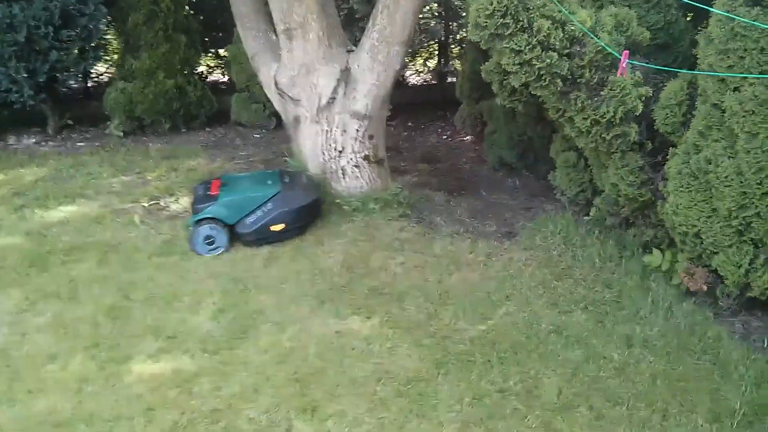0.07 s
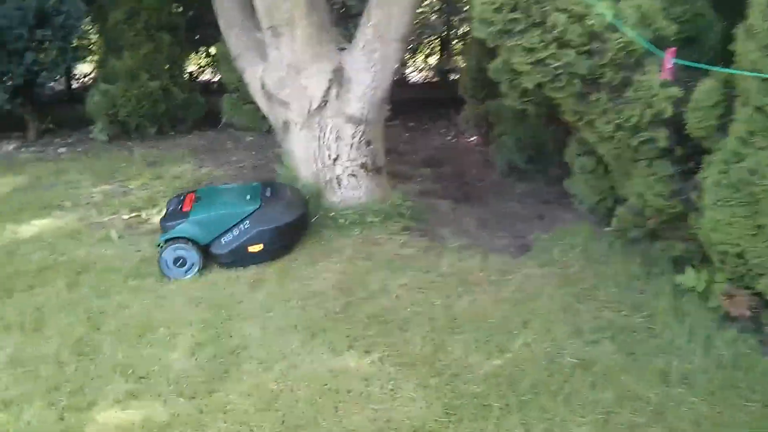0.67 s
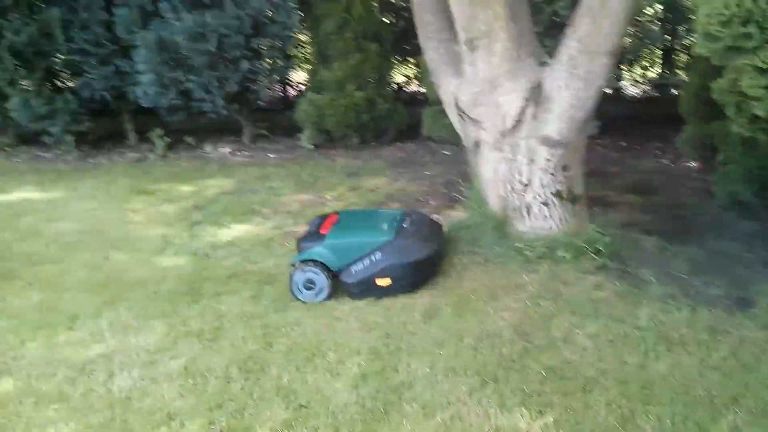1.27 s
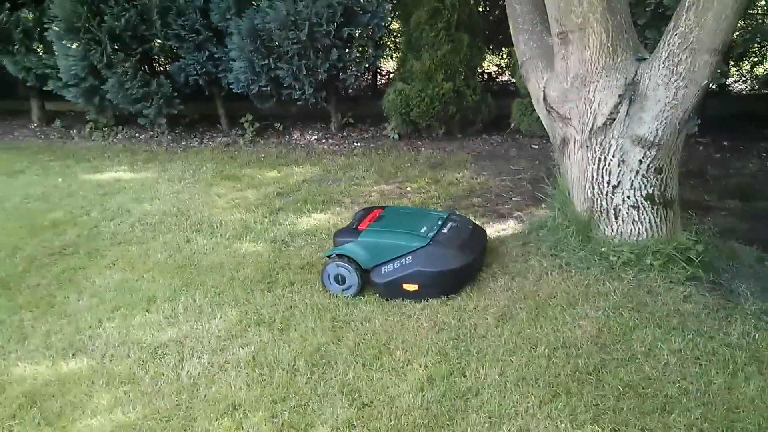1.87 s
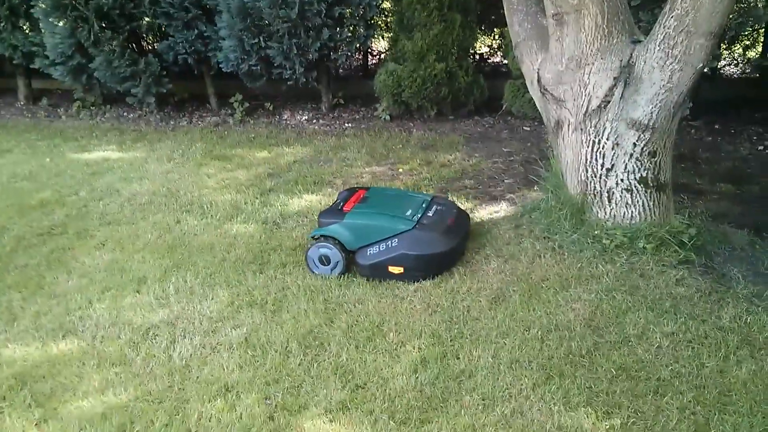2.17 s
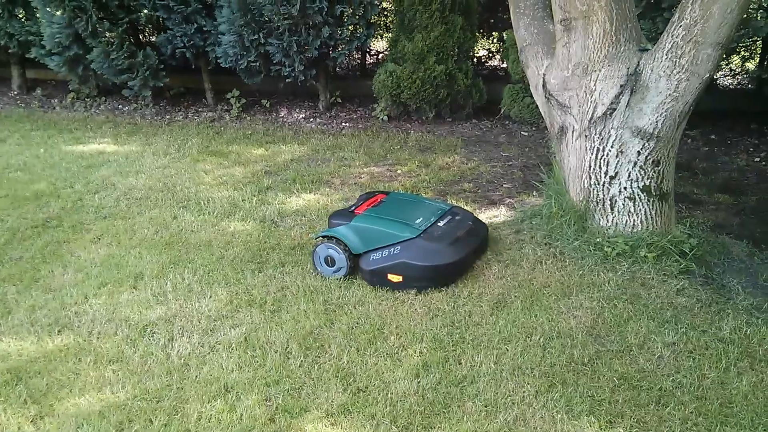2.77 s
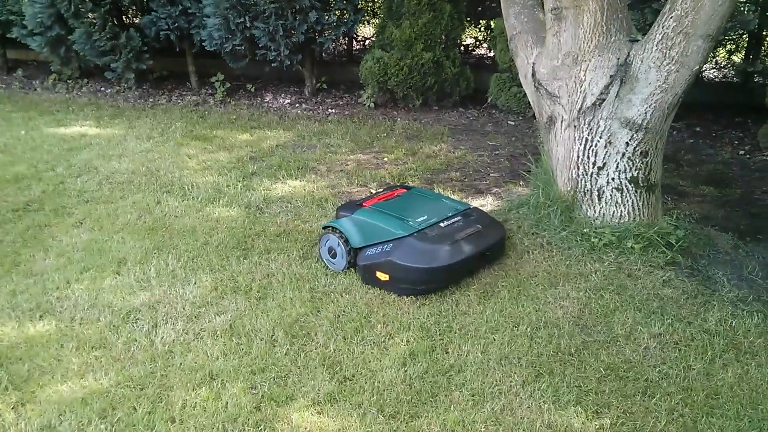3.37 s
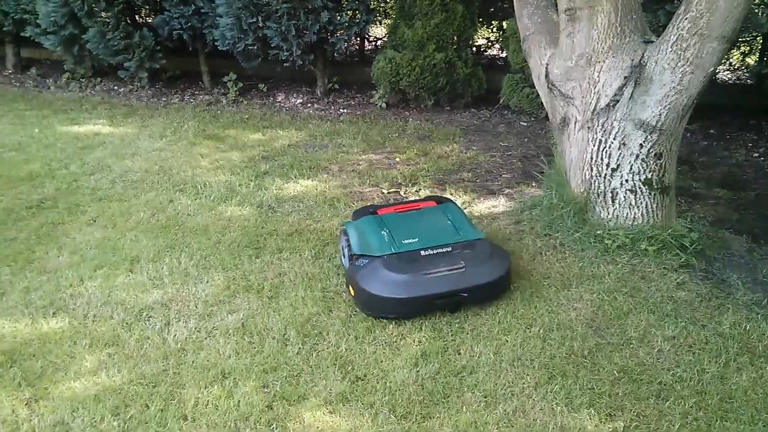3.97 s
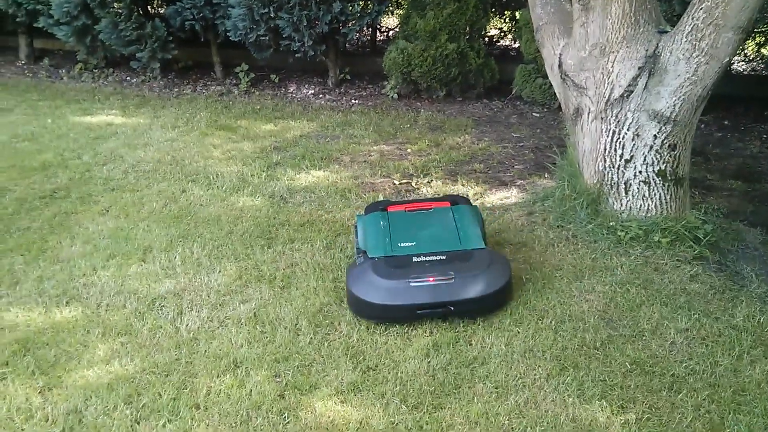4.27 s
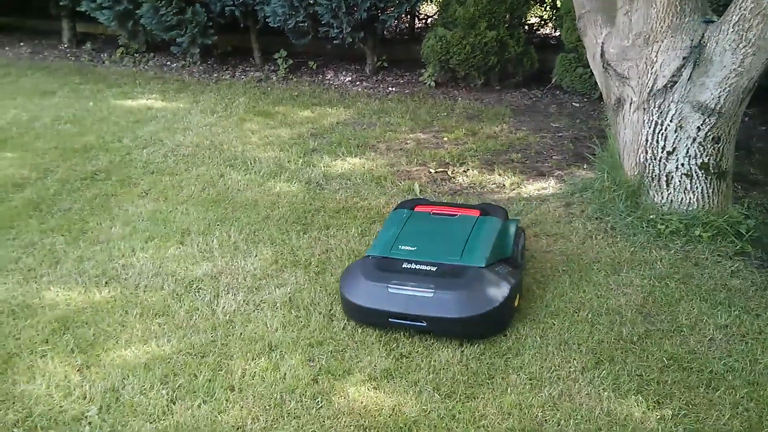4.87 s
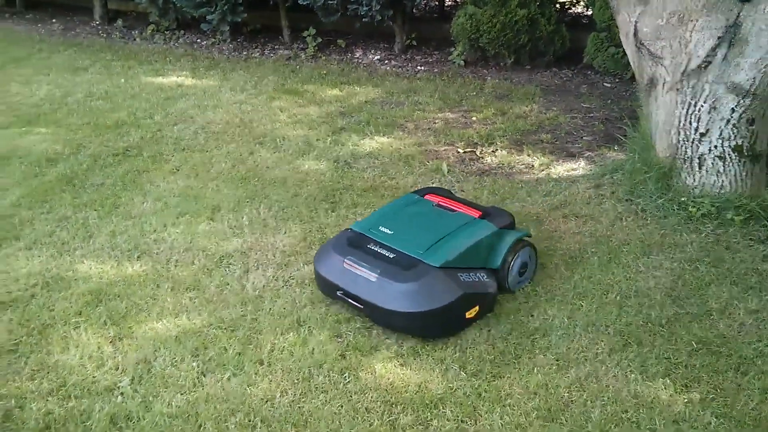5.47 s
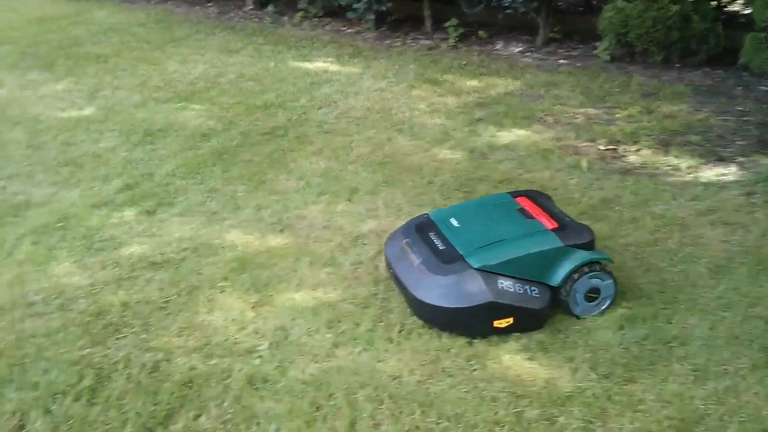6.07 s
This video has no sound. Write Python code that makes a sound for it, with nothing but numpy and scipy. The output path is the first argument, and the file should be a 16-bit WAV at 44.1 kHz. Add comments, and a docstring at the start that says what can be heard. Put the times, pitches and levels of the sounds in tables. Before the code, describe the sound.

Sparrows twitter in a breezy garden as an electric robot mower slows its blade, creeps with a thin whine and resumes cutting.

```python
"""A garden lawn, with a robotic mower a few metres away. The hum and whoosh of its blade wind down,
the wheel motors creep and whine in surges, then the blade spins up again and the machine turns
through the grass: gears chatter, stalks rustle and snip, the plastic chassis clacks.
Sparrows twitter in the hedge, each chirp a run of tiny pitch glides. A breeze rumbles
and thumps on the microphone, over a faint bed of distant air."""
import sys
import numpy as np
from scipy import signal
from scipy.fft import rfft, irfft
from scipy.io import wavfile
from scipy.ndimage import uniform_filter1d

SR = 44100
rng = np.random.default_rng(int(sys.argv[2]) if len(sys.argv) > 2 else 0)


def transcribe(signal):
    """Save signal, clipped to [-1, 1], as a 16-bit WAV file at the path in sys.argv[1]."""
    frames = np.atleast_2d(signal).T
    limited = np.clip(frames, -1, 1)
    pcm = np.round(limited * 32767).astype(np.int16)
    wavfile.write(sys.argv[1], SR, pcm)


N = 269451
TIME = np.arange(N) / SR

# Table levels are relative: each layer gets its final gain in its function.
# blade hum, and its motor driving and braking (multiple of the turning rate, level [dB])
HUM_PARTIALS = [(1, -45), (2, -71.5), (3, -57), (5, -60.5), (7, -79), (10, -65.5), (14, -57), (15, -59.5),
                (21, -67)]
DRIVING_PARTIALS = [(6, -73.5), (12, -82)]
BRAKING_PARTIALS = [(6, -57.5), (12, -59)]
# EQ curves of the noise layers (frequency [Hz], level [dB])
WHOOSH_SIDE_EQ = [(35, -44), (60, -11), (101, -12), (134, 11.5), (253, -0.5), (324, 5.5), (407, -4),
                  (488, -12.5), (623, 3.5), (688, -5), (784, 5), (1300, -10.5), (1960, 2.5), (2420, -24),
                  (3000, -26), (3900, -58), (6600, -120)]  # air swept by the blade, side-on
WHOOSH_FRONT_EQ = [(30, -12), (60, 11), (130, -7), (320, 6.5), (470, 2), (545, -16.5), (650, -0.5),
                   (780, -7), (950, -4), (1400, 8.5), (1800, -6.5), (2400, 2), (3000, -15), (4500, -16)]  # the same, head-on
RUSTLE_EQ = [(300, 10.5), (700, 13), (2000, 15.5), (2700, 9), (3500, 9.5), (5000, 11.5), (6500, 11.5),
             (7800, 4.5), (9300, 4.5), (11000, 5.5), (15500, 5.5)]  # brushed grass
CUT_EQ = [(2500, -47), (4000, -8), (4600, -2.5), (5200, 5), (6000, 4.5), (6900, -1), (7700, -17.5),
          (10000, -48)]  # hiss of the cut
SNIP_EQ = [(2500, -12), (4500, -1), (6800, 7), (8000, -5), (9500, 0), (12000, -3.5), (15500, -3)]  # crisp stalks
WIND_EQ = [(15, -37), (35, 0), (65, 4.5), (115, 0.5), (160, -7), (250, -21), (320, -31.5), (400, -38),
           (800, -57), (1600, -90)]  # low rumble
DISTANT_AIR_EQ = [(30, 22.5), (150, 19.5), (300, 16), (500, 11.5), (800, 12.5), (1200, 12.5), (2000, -9),
                  (2600, -33), (3500, 0), (6000, -4), (15500, -10.5)]  # background bed
# fader rides (time [s], level [dB])
RUSTLE_RIDE = [(0, -55.5), (.2, -55.5), (.3, -63.5), (.85, -67), (1.3, -76), (1.7, -69), (2.2, -80),
               (2.85, -70.5), (2.95, -62), (3.35, -67), (3.9, -58.5), (4.56, -57), (5.2, -58.5),
               (6.11, -61)]  # rises with travel over the lawn
CUT_RIDE = [(2.85, -84), (2.95, -63.5), (3.1, -73), (3.43, -64), (3.7, -57.5), (4.03, -60.5), (4.38, -56),
            (5.02, -57.5), (6.11, -52.5)]  # opens as the deck faces the listener
WHINE_RIDE = [(0, -67.5), (.6, -87), (1.3, -77.5), (1.8, -72), (2.1, -64), (2.7, -63), (3.1, -68.5),
              (4.5, -67), (6.11, -73.5)]  # steady part of the high motor whine
BREEZE_RIDE = [(0, -55), (.55, -57), (.75, -64.5), (1.05, -56.5), (1.25, -52.5), (1.8, -48.5), (1.98, -38),
               (2.7, -36.5), (3, -28.5), (3.25, -36.5), (3.6, -58), (4, -54.5), (4.2, -43), (4.55, -57),
               (4.75, -59.5), (6.11, -58.5)]  # strength of the breeze
GEAR_RIDE = [(0, -80), (.45, -64), (.64, -80), (.76, -65), (.97, -56), (1.3, -76), (1.45, -66.5),
             (1.96, -67), (2.4, -97), (2.75, -65.5), (3.2, -61.5), (3.5, -55.5), (3.9, -60), (4.15, -53.5),
             (4.95, -56.5), (5.22, -48.5), (5.75, -54.5), (6.11, -47.5)]  # chatter follows the load on the gears
# crisp snips and rustles (peak time [s], rise [s], decay [s], level [dB])
GRASS_SNIPS = [(.452, 0.013, 0.016, -62), (.594, 0.00091, 0.025, -51.5), (0.683, 0.0077, 0.029, -51),
               (.978, 0.13, 0.041, -64.5), (1.655, 0.029, .013, -47), (3.062, .002, .004, -51),
               (3.248, 0.003, 0.0048, -53.5), (3.68, 0.16, 0.092, -53.5), (4.38, 0.05, 0.15, -55.5),
               (4.66, 0.056, 0.16, -56.5), (5.34, .025, 0.04, -51.5), (5.63, 0.0028, 0.043, -40)]
# surges of the high whine (start [s], level [dB])
WHINE_SURGES = [(.68, -62.5), (1.07, -54.5), (1.69, -70), (1.88, -58), (2.1, -52), (2.3, -51),
                (2.49, -49.5), (2.7, -52.5), (2.9, -57.5), (3.11, -61.5), (3.32, -63), (3.53, -65),
                (3.73, -61), (3.93, -57), (4.24, -63)]
# wheel motors running up or down (start [s], length [s], from [Hz], to [Hz], level [dB])
WHEEL_GLIDES = [(.6, 0.32, 943, 863, -61.5), (.7, 0.18, 1150, 1198, -59.5), (.79, .21, 961, 1157, -52.5),
                (2.64, 0.12, 1170, 1296, -61.5), (2.78, 0.175, 912, 1148, -57),
                (2.94, 0.081, 1012, 960, -60)]
# gear mesh of the wheel motors as they steer (time [s], pitch [Hz])
STEERING_PITCH = [(2.7, 418), (2.87, 505), (3, 485), (3.09, 408), (3.23, 470), (3.35, 419.5), (3.48, 450.5),
                  (3.62, 526), (3.79, 412), (3.99, 460), (4.15, 512), (4.34, 461), (4.55, 455.6),
                  (4.7, 490), (4.85, 464.6), (5.1, 485), (5.35, 461.7), (6.11, 472.7)]
# mesh tone yields to overtones as the mower turns head-on (time [s], mesh [dB], overtones [dB])
STEERING_RIDE = [(2.7, -71.5, -82), (3, -63.5, -87), (3.3, -66.5, -59), (3.65, -69.5, -54.5),
                 (3.95, -73, -50), (4.8, -88, -50.5), (5.15, -71, -50.5), (5.75, -65, -56.5),
                 (6.11, -83, -72)]
# thumps of wind (peak time [s], length [s], level [dB])
WIND_BUFFETS = [(1.236, 0.064, -41), (2.05, 0.0141, -26), (2.06, 0.025, -19.5), (2.084, 0.019, -28),
                (2.285, 0.035, -26), (2.393, 0.05, -23), (2.459, 0.014, -26), (2.478, 0.029, -21.5),
                (2.6, 0.045, -23), (2.786, 0.025, -26), (2.865, 0.058, -18.5), (2.894, 0.03, -13),
                (2.9, .012, -13), (2.97, 0.016, -28), (3.001, 0.021, -21), (3.187, 0.037, -28),
                (3.46, 0.042, -37.5), (4.125, 0.043, -27), (4.24, 0.053, -35), (4.567, 0.079, -33),
                (4.995, 0.054, -37)]
# sparrow calls (start [s], length [s], first pitch [Hz], last pitch [Hz], level [dB])
SPARROW_CHIRPS = [(0.068, 0.085, 4720, 3500, -48.5), (0.318, 0.089, 4390, 3700, -55),
                  (0.633, 0.048, 5560, 5500, -53), (0.677, 0.09, 3700, 3414, -50.5),
                  (.81, .08, 3580, 3630, -61.5), (1.115, 0.15, 4820, 5460, -63.5),
                  (1.229, 0.094, 4150, 3250, -53), (1.404, 0.03, 3620, 3400, -68),
                  (1.609, 0.056, 5510, 5420, -46.5), (1.643, 0.093, 3960, 3390, -52),
                  (1.806, 0.15, 5110, 3330, -61.5), (2.119, .09, 4720, 3400, -65.5),
                  (2.389, .125, 5150, 3682, -51), (2.569, 0.1, 4895, 3300, -48),
                  (3.081, .06, 4800, 5670, -50.5), (3.129, 0.083, 3710, 3460, -53),
                  (3.577, 0.11, 4920, 4300, -52), (4.092, .13, 3720, 3400, -52.5),
                  (4.279, 0.035, 3650, 3700, -56), (4.735, 0.094, 4924, 3533, -45.5),
                  (5.259, 0.11, 3833, 3290, -55), (5.95, 0.084, 4450, 3300, -57.5),
                  (6.078, .035, 3780, 3800, -51)]
# bands of gear chatter (multiple of the centre pitch, width [Hz], level [dB])
CHATTER_BANDS = [(.88, 68, -4.5), (1, 75.4, 5), (1.11, 108, 2.5), (1.4, 262, -7.5), (1.698, 266, -10)]
# resonances of the plastic shell (frequency [Hz], width [Hz], level [dB])
SHELL_MODES = [(940, 85, 1), (1960, 270, -32)]
# knocks of the chassis (start [s], level [dB], ring pitch [Hz], decay [s])
CHASSIS_CLACKS = [(0.459, -50.5, 935, 0.016), (0.72, -47.5, 1233, 0.013), (0.919, -32, 1290, 0.0033),
                  (.926, -25, 1720, 0.00044), (0.931, -58, 1540, 0.0049), (0.9837, -38.5, 1120, 0.0035),
                  (1.48, -54, 922, 0.011), (2.793, -36.5, 1210, 0.0045), (5.954, -34.5, 1432, 0.0071),
                  (5.987, -39.5, 1404, .02)]

BLADE_HZ, IDLE_HZ = 66.82, 5  # turning rates: full speed and idle
BRAKE_AT_S, BRAKE_HZ_PER_S = .14, 66
RESTART_AT_S, SPIN_UP_S = 2.45, .75


def undb(db):
    """Decibels to gain."""
    return 10 ** (np.asarray(db) / 20)


def unit(x):
    """Scale to rms 1."""
    return x / np.sqrt(np.mean(x ** 2) + 1e-20)


def curve(rows, axis=1):
    """One column of a table, joined by straight lines in time."""
    rows = np.asarray(rows)
    return np.interp(TIME, rows[:, 0], rows[:, axis])


def fader(rows):
    """Gain of a fader ride, faded out beyond its ends."""
    outside = np.maximum(rows[0][0] - TIME, TIME - rows[-1][0]).clip(0)
    return undb(curve(rows)) * np.exp(-outside / 0.028)


def eq(x, points):
    """Shape x with an EQ curve; rms 1."""
    hz, db = np.transpose(points)
    bins_hz = np.fft.rfftfreq(N, 1 / SR) + 1
    gain = undb(np.interp(np.log(bins_hz), np.log(hz), db))
    return unit(irfft(rfft(x) * gain, N))


def drift(rate):
    """Random modulator of spread near 1, with rate new values a second."""
    knots = rng.standard_normal(N)
    return 1.2 * np.interp(TIME * rate, np.arange(N), knots)


def turns(hz):
    """Phase in radians of something that turns at hz."""
    return 2 * np.pi * np.cumsum(hz) / SR


def crackle(rate, spread_db):
    """Tiny clicks of uneven size, about rate a second; rms 1."""
    size = undb(spread_db * rng.exponential(size=N).clip(0, 3.5))
    return unit((rng.random(N) < rate / SR) * rng.standard_normal(N) * size)


def partials(hz, rows, flutter_db, flutter_rate):
    """Harmonics of a turning shaft, each with its own level flutter."""
    phase, out = turns(hz), np.zeros(N)
    for multiple, db in rows:
        gain = np.sqrt(2) * undb(db + flutter_db * drift(flutter_rate))
        out += gain * np.sin(multiple * phase + 2 * np.pi * rng.random())
    return out


def noise_band(hz, width):
    """Narrow noise around a moving centre; rms 1."""
    lowpass = signal.butter(2, width / 2, fs=SR, output="sos")
    a, b = signal.sosfilt(lowpass, rng.standard_normal((2, N)))
    phase = turns(hz)
    return unit(a * np.cos(phase) + b * np.sin(phase))


def add(out, start, x):
    """Mix x into out from a start time."""
    i = max(int(start * SR), 0)
    out[i:i + len(x)] += x[:max(len(out) - i, 0)]


def glides(rows, rasp, rasp_rate, transpose=1):
    """Tones that swell, slide and fade, roughened by a fast pitch waver."""
    out, waver = np.zeros(N), transpose * (1 + rasp * drift(rasp_rate))
    for start, length, from_hz, to_hz, db in rows:
        u = np.linspace(0, 1, int(length * SR))
        hz = (from_hz + (to_hz - from_hz) * u) * np.roll(waver, -int(start * SR))[:len(u)]
        add(out, start, undb(db) * np.sqrt(2) * np.sin(np.pi * u) * np.sin(turns(hz)))
    return out


def garden_reverb(x, t60, wet_db):
    """A short, diffuse tail off the hedges and fence."""
    t = TIME[:SR // 2]
    tail = rng.standard_normal(len(t)) * undb(-60 * t / t60) * (1 - np.exp(-t / .012))
    return x + undb(wet_db) * signal.fftconvolve(x, tail / np.linalg.norm(tail))[:N]


def blade_speed():
    """Share of full speed: the blade brakes steadily, idles, then spins up and levels off."""
    falling = 1 - BRAKE_HZ_PER_S / BLADE_HZ * (TIME - BRAKE_AT_S).clip(0)
    rising = 1 - np.exp(-(TIME - RESTART_AT_S).clip(0) / SPIN_UP_S)
    return np.maximum(np.maximum(falling, rising), IDLE_HZ / BLADE_HZ)


def blade():
    """The blade hums and sweeps air once a turn; its motor sings, loudest while braking."""
    speed = blade_speed()
    before_restart = TIME < RESTART_AT_S
    hz = BLADE_HZ * speed * (1 + 0.0029 * drift(10))
    hum = partials(hz, HUM_PARTIALS, flutter_db=3, flutter_rate=10)
    # the hum needs nearly full speed, and is weaker side-on, before the restart
    hum *= speed ** 23.6 * np.where(before_restart, undb(-4.5), undb(-2.5))
    braking = partials(hz, BRAKING_PARTIALS, flutter_db=2.5, flutter_rate=20)
    driving = partials(hz, DRIVING_PARTIALS, flutter_db=7.5, flutter_rate=12)
    motor = np.where(before_restart, braking, driving) * speed ** 5.2
    tremolo = 1 + 0.071 * np.sin(turns(hz))
    side = undb(-44 + 3.7 * drift(30.6)) * eq(crackle(rate=6000, spread_db=1.5), WHOOSH_SIDE_EQ)
    front = undb(-48.5 + 4.5 * drift(8.9)) * eq(crackle(rate=6500, spread_db=-0.5), WHOOSH_FRONT_EQ)
    whoosh = speed ** 7.95 * np.where(before_restart, side, speed ** 14 * front)
    return hum + motor + tremolo * whoosh


def grass(ticks_per_s=18, tick_decay_s=.0012):
    """Stalks brush and tick under the machine and are snipped in a fine hiss."""
    rustle_grain, cut_grain, snip_grain = (crackle(rate=14000, spread_db=2.3) for _ in range(3))
    triggers = (rng.random(N) < ticks_per_s / SR) * rng.uniform(.4, 1, N)
    tick_envelope = signal.lfilter([1], [1, -np.exp(-1 / (tick_decay_s * SR))], triggers)
    ticks = undb(-17.5) * eq(tick_envelope * rng.standard_normal(N), SNIP_EQ)
    rustle = undb(0.5) * fader(RUSTLE_RIDE) * (eq(rustle_grain, RUSTLE_EQ) + ticks)
    cut = undb(3.94) * fader(CUT_RIDE) * eq(cut_grain, CUT_EQ)
    snip_envelope = np.zeros(N)
    for peak, rise, decay, db in GRASS_SNIPS:
        falloff = np.maximum((peak - TIME) / rise, (TIME - peak) / decay).clip(0, 50)
        snip_envelope += undb(db) * np.exp(-falloff)
    return (rustle + cut) * undb(0.78 * drift(45)) + snip_envelope * eq(snip_grain, SNIP_EQ)


def wheel_whine(steady_hz=2182, surge_s=0.1297, surge_hz=(2228, 2136)):
    """The wheel motors creep: a thin whine, sagging surges and short run-ups and run-downs."""
    # the steady tone ducks 20 ms ahead of each surge
    duck = sum(np.exp(-((TIME - start + .02) / .014) ** 2) for start, _ in WHINE_SURGES)
    gain = undb(4 - 11 * duck + 2 * drift(25)) * fader(WHINE_RIDE)
    whine = gain * np.sin(turns(steady_hz + 12 * drift(90)))
    surges = [(start, surge_s, *surge_hz, db) for start, db in WHINE_SURGES]
    whine += glides(surges, rasp=.005, rasp_rate=200)
    whine += glides(WHEEL_GLIDES, rasp=.035, rasp_rate=260)
    return garden_reverb(whine, t60=.3, wet_db=-11)


def breeze(eddy_db=4, eddies_per_s=20):
    """Wind rumbles on the microphone; eddies make it flicker."""
    rumble = eq(rng.standard_normal(N), WIND_EQ)
    rumble /= np.sqrt(uniform_filter1d(rumble ** 2, size=3000))  # level it ahead of the fader
    return fader(BREEZE_RIDE) * undb(eddy_db * drift(eddies_per_s)) * rumble


def distant_air():
    """A faint, steady bed of outdoor noise."""
    return undb(-71.5) * eq(rng.standard_normal(N), DISTANT_AIR_EQ)


def syllables(nominal_s=.036, sweep_depth=0.0732, fade_db=4):
    """Break each chirp into fading glides that sweep down and up by turns, no two alike."""
    rows = []
    for start, length, first_hz, last_hz, db in SPARROW_CHIRPS:
        count = max(round(length / nominal_s), 1)
        step = length / count
        for k, u in enumerate(np.linspace(0, 1, count)):
            detune, accent = rng.standard_normal(2)
            hz = first_hz * (last_hz / first_hz) ** (u ** .75) * (1 + 0.0262 * detune)
            sweep = sweep_depth * (-1) ** (count - k)
            level = db - fade_db * u + 1.7 * accent
            rows.append((start + k * step, step, hz * (1 + sweep), hz * (1 - sweep), level))
    return rows


def sparrows():
    """Twittering glides from both sides of the syrinx, dulled and smeared by the hedges."""
    notes = syllables()
    low_voice = glides(notes, rasp=0.0415, rasp_rate=600)
    high_voice = glides(notes, rasp=0.0467, rasp_rate=600, transpose=1.27)
    chirps = (low_voice + undb(-10) * high_voice) * undb(2.5 * drift(260))
    leaves = signal.butter(5, 6700, fs=SR, output="sos")
    return undb(-0.5) * garden_reverb(signal.sosfilt(leaves, chirps), t60=0.25, wet_db=0)


def gears(rest_hz=1207.4, rise_hz=186.9):
    """Teeth chatter in bands that rise with the blade; the plastic shell throbs at its own pitch."""
    speed = blade_speed()
    centre_hz = (rest_hz + rise_hz * speed ** 12) * (1 + .015 * drift(14))
    chatter = sum(undb(db + 2 * drift(12)) * noise_band(multiple * centre_hz, width)
                  for multiple, width, db in CHATTER_BANDS)
    ring = sum(undb(db) * noise_band(hz * (1 + 0.01196 * drift(11)), width)
               for hz, width, db in SHELL_MODES)
    throb = undb(-3.5 + 4.9 * drift(12)) * speed ** 3.5
    return fader(GEAR_RIDE) * (unit(chatter) + throb * unit(ring))


def chassis():
    """Plastic clacks: a damped ring with a gritty edge, kept to the band the shell radiates."""
    clacks, t = np.zeros(N), TIME[:SR // 8]
    for start, db, hz, decay in CHASSIS_CLACKS:
        gritty_ring = np.sin(2 * np.pi * hz * t) + .8 * rng.standard_normal(len(t))
        add(clacks, start, undb(db) * np.exp(-t / decay) * gritty_ring)
    shell = signal.butter(3, [800, 2200], "band", fs=SR, output="sos")
    return undb(1) * garden_reverb(signal.sosfilt(shell, clacks), t60=0.21, wet_db=-7.5)


def buffets():
    """Wind thumps the microphone: a few pressure swings that quicken and pass."""
    out = np.zeros(N)
    for peak, length, db in WIND_BUFFETS:
        u = np.linspace(0, 1, int(length * SR))
        hz = (95.4 + 91.2 * u) * (0.0289 / length) ** 0.74  # shorter thumps sit higher
        phase = turns(hz) + 2 * np.pi * rng.random()
        push = np.sin(np.pi * u) ** 2
        # the swings steepen at the height of the push
        edge = 0.17 * push * np.sin(2 * phase) + 0.024 * push ** 2 * np.sin(3 * phase)
        add(out, peak - length / 2, undb(db) * push * (np.sin(phase) + edge))
    return out


def steering():
    """The gear mesh bends in pitch as the wheels steer; worn teeth add fluttering overtones."""
    phase = turns(curve(STEERING_PITCH) * (1 + .021 * drift(160)))
    mesh = undb(curve(STEERING_RIDE) + 7 + 2 * drift(30)) * np.sin(phase)
    overtones = sum(undb(db + 4 * drift(35)) * np.sin(multiple * phase)
                    for multiple, db in [(3, -5), (4, 0), (5, -10)])
    overtones *= undb(curve(STEERING_RIDE, axis=2) - 7)
    return (mesh + overtones) * (TIME > STEERING_PITCH[0][0])


def scene():
    """Mono mix of mower, birds and wind over the distant air."""
    mower = blade() + gears() + steering() + wheel_whine() + grass() + chassis()
    return (mower + sparrows() + breeze() + buffets() + distant_air())[None]


def record(dry):
    """A steep high cut at 15.7 kHz on the master."""
    high_cut = signal.ellip(10, .2, 70, 15700, fs=SR, output="sos")
    return signal.sosfilt(high_cut, dry)


dry = scene()
out = record(dry)
transcribe(out)
```